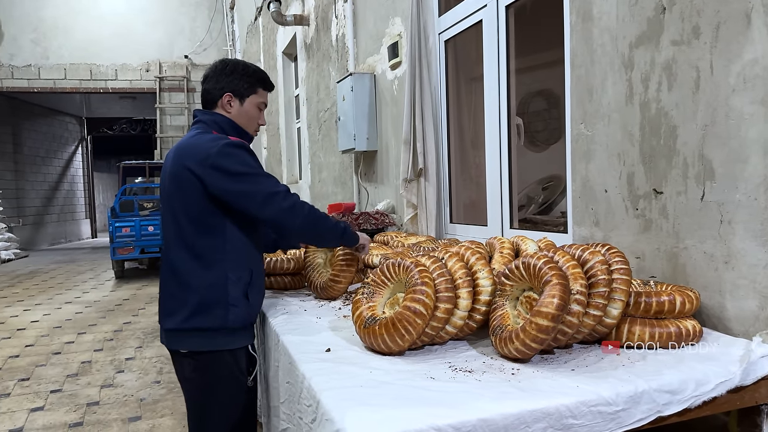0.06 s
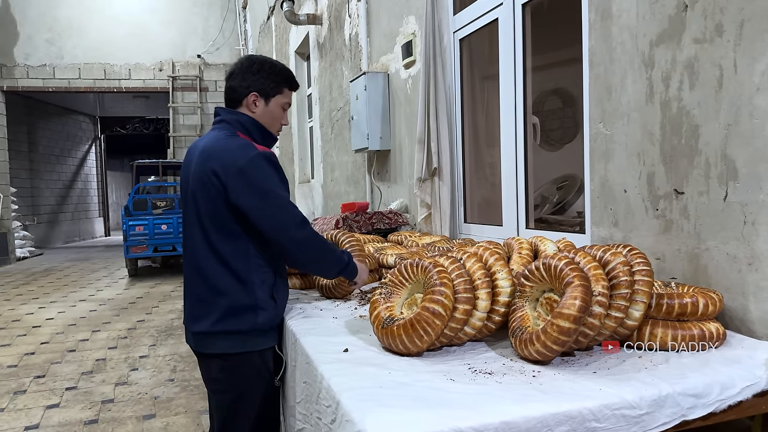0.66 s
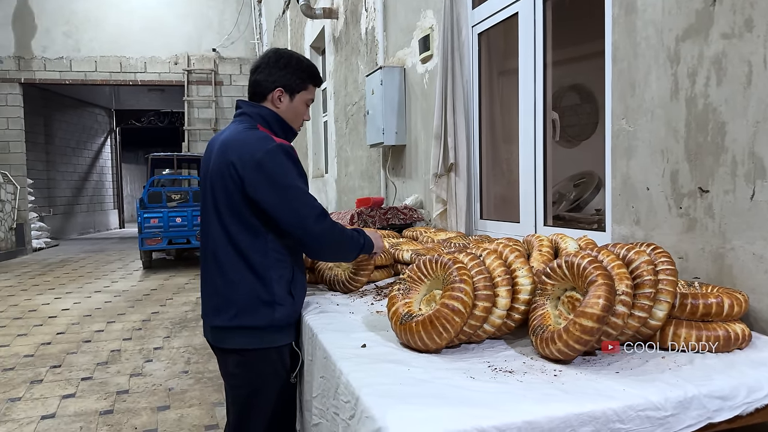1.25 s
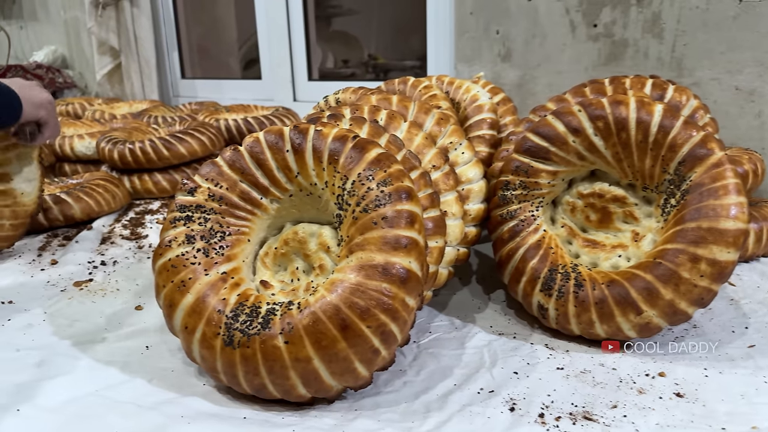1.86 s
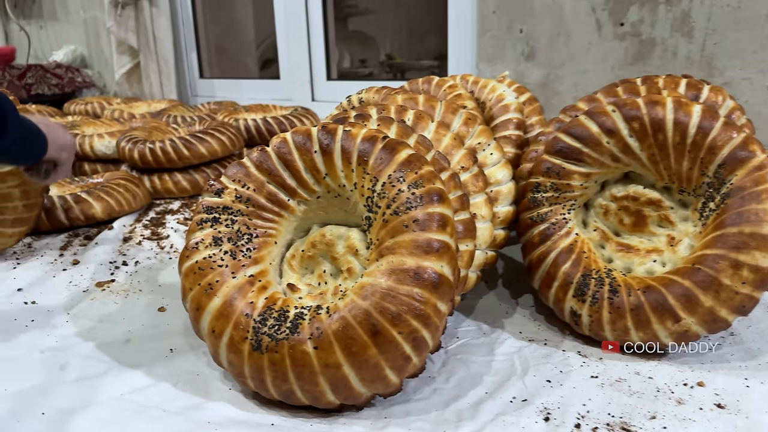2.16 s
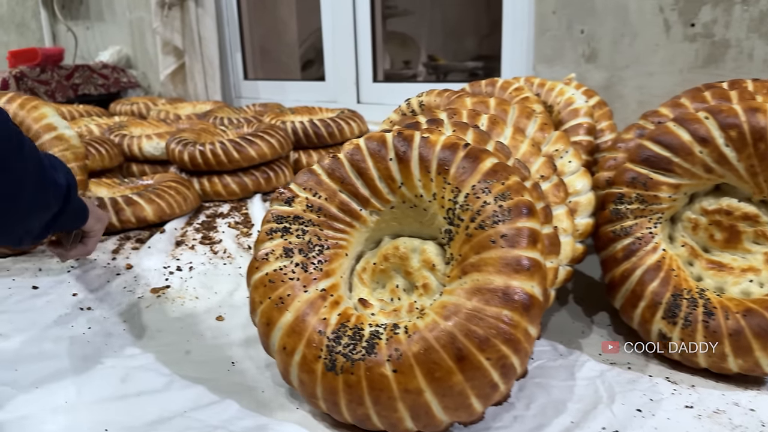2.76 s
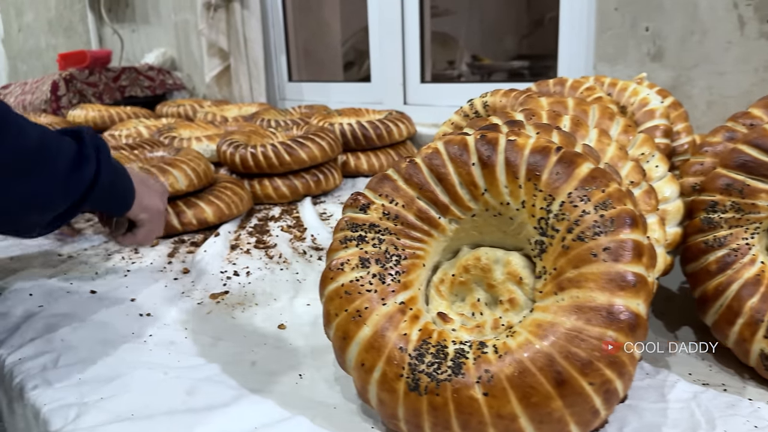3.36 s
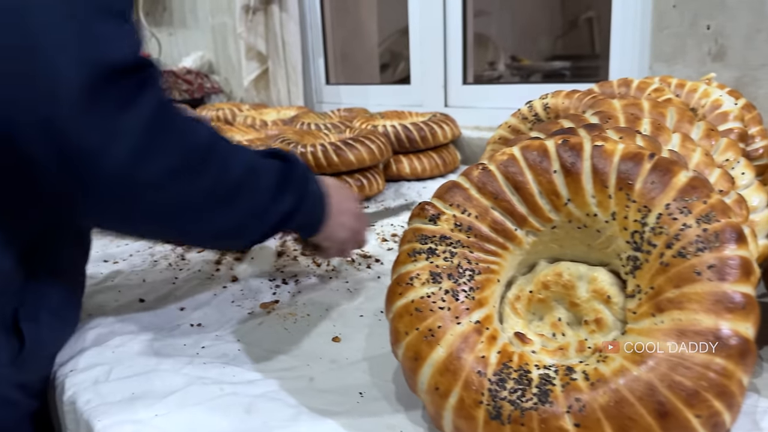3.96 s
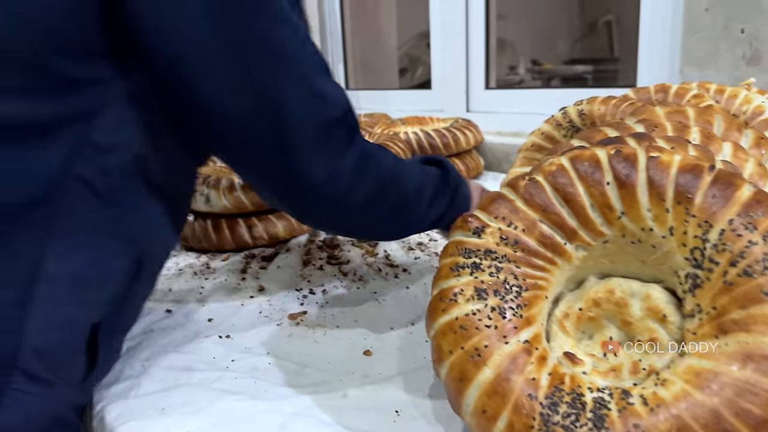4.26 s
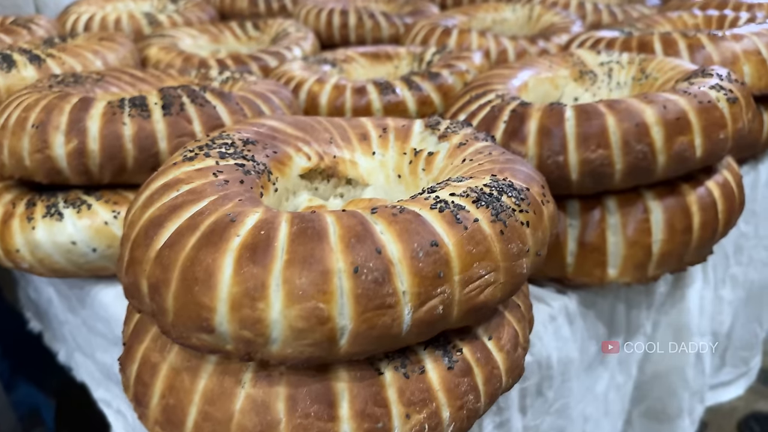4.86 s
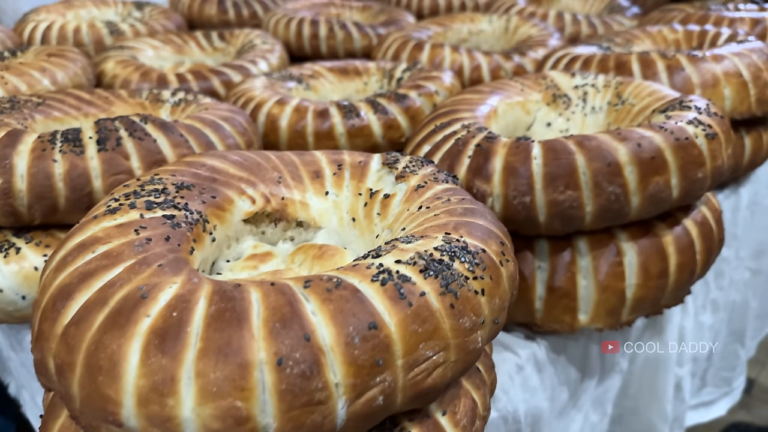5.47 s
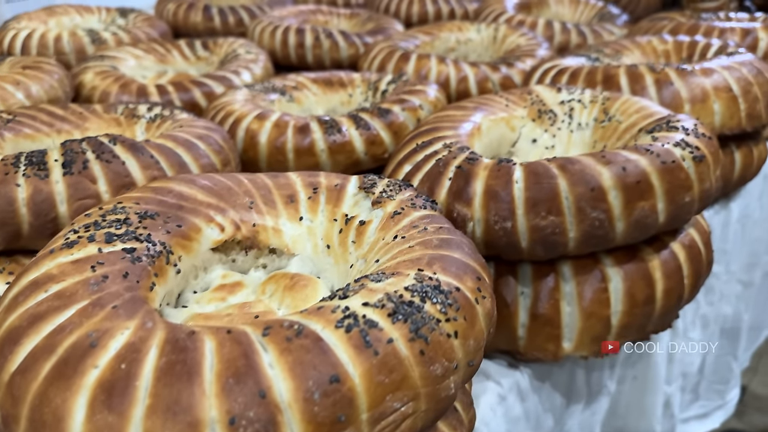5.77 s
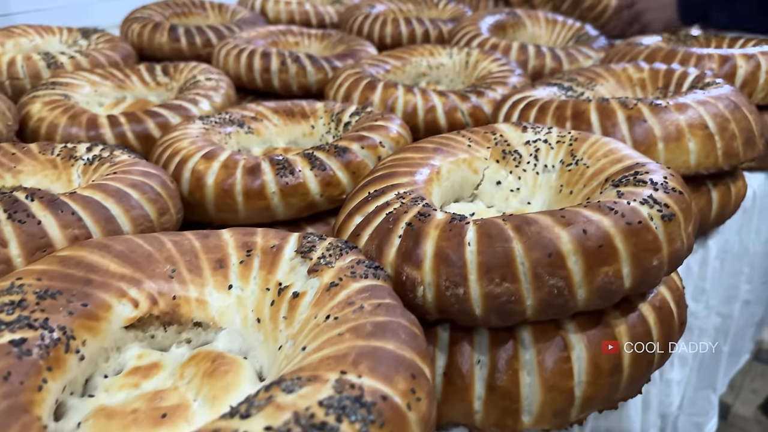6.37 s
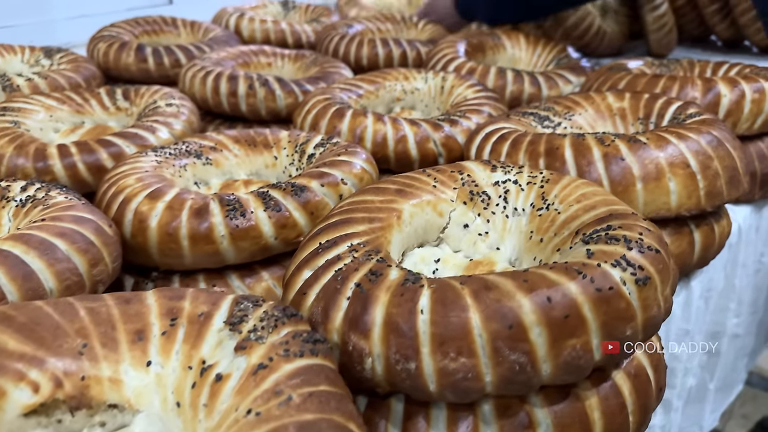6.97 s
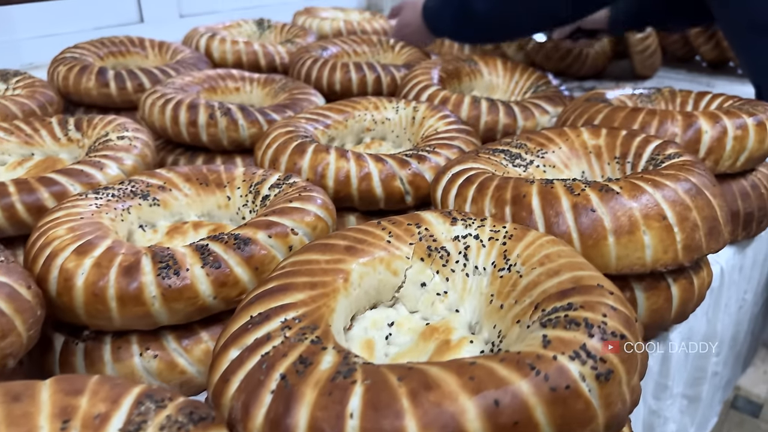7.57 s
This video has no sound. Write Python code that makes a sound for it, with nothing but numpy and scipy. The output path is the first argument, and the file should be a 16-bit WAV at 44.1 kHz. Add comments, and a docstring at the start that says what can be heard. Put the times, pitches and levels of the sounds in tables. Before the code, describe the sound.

Crusty ring flatbreads are stacked on a cloth-covered table, heard nearby through a small microphone with a light echo from hard yard walls. From the start, crust rubs on crust in short, dry, crackling strokes, with hollow knocks at about 0.1 and 0.7 seconds and faint distant pats. Between 1.5 and 2.7 seconds the scrapes are brightest and loudest, and flakes snap sharply. Just after 3 seconds a rim clacks, loaves knock and the table gives a low thump. Softer, longer scrapes and more taps follow around 4 seconds, while a sleeve rustles faintly. From 5 seconds the scrapes are sparser, with a sharp snap and knock near 5.3, and faint echoing patting runs far off at about three a second. A cluster of hollow knocks and a table thump lands at 7 seconds. Tiny crumb ticks are scattered throughout, over very faint steady background noise.

```python
"""Stacking crusty ring flatbreads

Loaves are stacked on a cloth-covered table in a hard-walled bakery yard. Crust scrapes on crust in
short crackling strokes, brighter when pressed harder. Flakes snap, rims clack, crumbs skitter,
loaves knock hollowly and the table booms. A sleeve rustles with each reach; something far off is
patted in runs of about three a second, heard only through its echo."""
import sys
import numpy as np
from scipy import signal
from scipy.fft import rfft, irfft
from scipy.io import wavfile
from scipy.ndimage import uniform_filter1d

SR = 44100
rng = np.random.default_rng(int(sys.argv[2]) if len(sys.argv) > 2 else 0)


def wav_out(sig):
    """Save sig, one row per channel (or a flat mono array), as 16-bit PCM at SR to the path in sys.argv[1]."""
    wavfile.write(sys.argv[1], SR, np.round(np.clip(np.atleast_2d(sig).T, -1, 1) * 32767).astype(np.int16))


N = 336026
TIME = np.arange(N) / SR
LOW_CUT_HZ, HIGH_CUT_HZ = 55, 16000

# crust rubbing on crust: (time [s], length [s], level [dB])
STROKES = [(0.108, 0.062, -37), (0.289, 0.033, -39), (0.482, 0.049, -35.5), (0.643, 0.035, -41),
           (0.671, 0.039, -37.5), (.847, 0.019, -43.5), (1.328, 0.024, -36.5), (1.509, 0.0073, -32.5),
           (1.524, 0.053, -32.5), (1.698, 0.0035, -24.5), (1.736, 0.0082, -28), (1.883, 0.024, -27),
           (1.92, 0.02, -30.5), (2.057, 0.0054, -29.5), (2.066, 0.015, -25), (2.239, 0.005, -32.5),
           (2.25, 0.043, -45.5), (2.402, 0.053, -38), (2.431, 0.011, -27.5), (2.462, 0.011, -33),
           (2.52, 0.0095, -39), (2.589, 0.039, -36.5), (2.624, 0.014, -36.5), (2.654, 0.037, -42.5),
           (2.878, 0.029, -49.5), (2.954, 0.0092, -40), (2.983, 0.079, -44.5), (3.125, 0.067, -40),
           (3.201, 0.035, -39), (3.424, 0.12, -41.5), (3.512, 0.014, -40), (3.77, 0.18, -46.5),
           (3.839, 0.025, -35.5), (3.89, 0.21, -52), (4.81, 0.036, -37.5), (4.949, 0.015, -42),
           (4.974, 0.015, -38), (5.248, 0.016, -38.5), (5.609, 0.019, -33), (5.792, 0.028, -37.5),
           (5.96, 0.026, -36.5), (6.145, 0.0051, -32), (6.334, 0.0017, -37), (6.394, 0.0017, -36),
           (6.941, 0.035, -41.5), (6.981, 0.011, -37), (7.098, 0.021, -46), (7.497, 0.0078, -48.5)]
# loaf in hand: (from [s], ring [Hz], ring [dB], sizzle [dB], brightness [dB], hollowness [dB],
# echo send [dB])
LOAVES = [(0, 1630, 6, 8, -5.5, -0.5, -12), (0.6, 3600, 7, 7.5, -6, -9.5, -11),
          (1.4, 3160, 2.5, 5, -5, -3, -20.5), (2.3, 1265, 9, 2, 2.5, 2, -17.5),
          (2.55, 657, 8.5, -0.5, 1, 3, -17), (2.9, 1440, -8, -0.5, -13, -6, -10.5),
          (3.35, 2730, 4, 3, -0.5, 3.5, -17), (3.7, 1320, -1.5, 7, -8.5, -6, -13),
          (4.4, 1290, 3, 2, -2.5, 1, -13.5), (5.5, 1270, 7, 10.5, -2.5, 2.5, -14),
          (6.1, 1190, 4.5, 8.5, -6.5, -3.5, -10)]


def scrapes(attack_share, release_s, touch_db, treble_per_db, ring_per_db, size=8192):
    """Pressure breaks finer flakes and flexes the shell. Returns direct sound and ringless echo feed."""
    direct, to_walls, t, hz = np.zeros(N), np.zeros(N), TIME[:size], bins(size)
    bright = at_hz([(1300, 0), (4000, .75), (14000, 1)], hz)
    hollow = at_hz([(250, 1), (1000, 0)], hz)
    bass_cut_db = at_hz([(60, -18), (190, -1.5)], hz)
    ordinary_stroke_db = -35
    for s, length_s, level_db in STROKES:
        ring_hz, ring_db, _, bright_db, hollow_db, _ = loaf_at(s)
        force_db = level_db - ordinary_stroke_db
        bright_db += treble_per_db * force_db
        ring_db += ring_per_db * max(force_db, 0)
        tone_db = crust_colour(s, hz) + bright_db * bright + hollow_db * hollow + bass_cut_db
        pressure = 1 - np.exp(-t / (attack_share * length_s))
        pressure *= np.exp(-np.maximum(t - length_s, 0) / release_s)
        pressure *= from_db(touch_db * np.exp(-t / 0.0091))  # first touch bites hardest
        grit = sum(crust_patch(size, ring_s=0.0012) for _ in range(2))
        splinters = fractures(size, per_s=110, spread_db=3.5, ridge_db=0, ridges_per_s=260)
        sound = (steady(grit, window_s=0.014) + from_db(16) * splinters) * pressure
        gain = from_db(level_db) * np.sqrt(length_s * SR / size)
        add(direct, s, gain * rms_one(colour(sound, tone_db + ring_db * hump(hz, ring_hz))))
        add(to_walls, s, gain * rms_one(colour(sound, tone_db)))
    return direct, to_walls


def crust_patch(size, ring_s):
    """A rubbed patch of crust: a shower of fractures excites its own small resonances."""
    cracks = fractures(size, per_s=2400, spread_db=4.5, ridge_db=5.5, ridges_per_s=260)
    response = rng.standard_normal(512) * np.exp(-TIME[:512] / ring_s)
    return signal.fftconvolve(cracks, response / np.linalg.norm(response))[:size]


def fractures(size, per_s, spread_db, ridge_db, ridges_per_s):
    """Tiny uneven cracks that clump as the ridges of the loaves catch."""
    onsets = rng.random(size) < per_s / SR
    heft = np.minimum(rng.exponential(1, size), 3)
    ridges = np.interp(TIME[:size] * ridges_per_s, np.arange(size), rng.uniform(-1.9, 1, size))
    return onsets * rng.choice([-1, 1], size) * from_db(spread_db * heft + ridge_db * ridges)


def crust_colour(s, hz):
    """Crust spectrum in dB, plus the sizzle of the current loaf's finest flakes."""
    # rubbed crust: (frequency [Hz], level [dB])
    spectrum = [(170, -0.5), (280, 3), (440, 0), (660, 0), (900, -4), (1280, -1), (2000, -3), (3000, -1),
                (7600, -11.5), (11000, -18), (14500, -15)]
    _, _, sizzle_db, *_ = loaf_at(s)
    return at_hz(spectrum, hz) + sizzle_db * at_hz([(8000, 0), (13000, 1)], hz)


def loaf_at(s):
    """Settings of the loaf in hand, without the start time."""
    return LOAVES[sum(row[0] <= s for row in LOAVES[1:])][1:]


def flake_snaps(crumble_s, crumble_gain, ring_above_db, size=2048):
    """A flake cracks once and crumbles; a weak snap is dry, a hard one rings briefly."""
    # (time [s], peak [dB], ring [Hz])
    snaps = [(0.863, -22, 4000), (0.935, -21, 3300), (1.740, -16, 3000), (1.886, -15, 3130),
             (2.162, -16.5, 4100), (2.429, -29, 3300), (2.627, -19, 7160), (2.644, -17.5, 2200),
             (2.664, -24, 3130), (2.673, -22, 3570), (3.224, -22.5, 2940), (4.529, -23.5, 6600),
             (5.015, -25, 2440), (5.252, -15.5, 6170), (6.505, -28.5, 1410)]
    out, t, hz = np.zeros(N), TIME[:size], bins(size)
    tilt_db = at_hz([(400, -8), (3000, -5)], hz)
    for s, peak_db, ring_hz in snaps:
        crack = crumble_gain * rng.standard_normal(size) * np.exp(-t / crumble_s)
        crack[0] += 1
        ring_db = max(peak_db - ring_above_db, 0)
        sound = colour(crack, crust_colour(s, hz) + tilt_db + ring_db * hump(hz, ring_hz))
        add(out, s, at_peak(sound, peak_db))
    return out


def rim_taps(touch_s, decay_s, note_db, size=4096):
    """A rim lands without sliding: a dull burst of fractures sounds the hollow under the crust."""
    # (time [s], peak [dB], hollow note [Hz])
    taps = [(3.151, -21.5, 1200), (3.894, -20.5, 1830), (4.039, -23.5, 1300), (4.611, -31.5, 1230),
            (4.651, -34, 1800), (6.943, -20.5, 610)]
    # (frequency [Hz], level [dB])
    clack_spectrum = [(150, 5.5), (2000, -1), (2900, -5), (8000, -31), (15000, -22)]
    out, t, hz = np.zeros(N), TIME[:size], bins(size)
    envelope = (1 - np.exp(-t / touch_s)) * np.exp(-t / decay_s)
    for s, peak_db, note_hz in taps:
        cracks = fractures(size, per_s=8000, spread_db=2, ridge_db=3, ridges_per_s=220)
        sound = colour(cracks * envelope, at_hz(clack_spectrum, hz) + note_db * hump(hz, note_hz))
        add(out, s, at_peak(sound, peak_db))
    return out


def loaf_knocks(t60_cycles, overtone_db, contact_s, start_ratio, end_ratio, sag_cycles):
    """Loaf hits loaf: fast flexing arrives first, so the note sags; the soft crumb damps it."""
    # (time [s], level [dB], pitch [Hz])
    knocks = [(.098, -29, 128), (.742, -25.5, 490), (.75, -35.5, 203), (1.56, -30, 251), (3.063, -30, 640),
              (3.136, -23, 543), (3.148, -26.5, 239), (3.894, -40, 200), (4.056, -39, 126),
              (4.487, -36, 470), (4.515, -37.5, 173), (4.706, -38, 195), (4.815, -28.5, 263),
              (5.254, -29.5, 186), (6.337, -35.5, 220), (6.956, -23.5, 240), (6.974, -24.5, 370),
              (6.984, -24.5, 121), (7.158, -30.5, 147)]
    out, t = np.zeros(N), TIME[:SR // 4]
    for s, level_db, hz in knocks:
        pitch_hz = hz * (end_ratio + (start_ratio - end_ratio) * np.exp(-t * hz / sag_cycles))
        phase = 2 * np.pi * np.cumsum(pitch_hz) / SR
        fade = from_db(-60 * t * hz / t60_cycles)
        note = fade * np.sin(phase) + from_db(overtone_db) * fade ** 2 * np.sin(2 * phase)
        add(out, s, from_db(level_db) * note * (1 - np.exp(-t / contact_s)))
    return out


def crumbs(skitter_s, pinch_db, stray_db, mean_wait_s, size=2048):
    """Pinches of crumbs and seeds skitter in dry ticks; three strays follow each stroke."""
    # a pinch breaks loose: (time [s])
    pinch_times = [.981, 1.086, 1.110, 1.152, 2.783, 4.486, 4.539, 5.098, 5.165, 5.229, 5.322, 6.361, 6.455,
                   6.738, 7.241]
    falls = [(s, pinch_db) for s in pinch_times]
    for s, length_s, _ in STROKES:
        falls += [(s + length_s + wait_s, stray_db) for wait_s in rng.exponential(mean_wait_s, 3)]
    out, t, hz = np.zeros(N), TIME[:size], bins(size)
    thin_db = at_hz([(300, -16), (2500, 0)], hz)
    for s, peak_db in falls:
        ticks = fractures(size, per_s=1800, spread_db=4, ridge_db=4, ridges_per_s=220)
        sound = colour(ticks * np.exp(-t / skitter_s), crust_colour(s, hz) + thin_db)
        add(out, min(s, TIME[-1]), at_peak(sound, peak_db))
    return out


def table_booms(contact_s):
    """The boards boom under the cloth; pitch depends on where the loaf lands."""
    # (time [s], level [dB], lowest mode [Hz])
    landings = [(0.096, -50.5, 82), (0.947, -49.5, 57.6), (3.159, -50, 94.3), (5.024, -59, 93.5),
                (5.26, -51, 99.6), (6.984, -44, 64), (7.504, -55.5, 102)]
    # table top: (ratio to lowest mode, level [dB], t60 [s])
    modes = [(1, 11, 0.19), (2.05, 7, 0.17), (4.2, 15, 0.019)]
    out, t = np.zeros(N), TIME[:SR]
    for s, level_db, hz in landings:
        boom = sum(from_db(db) * damped(t, hz * ratio, t60_s) for ratio, db, t60_s in modes)
        add(out, s, from_db(level_db) * boom * (1 - np.exp(-t / contact_s)))
    return out


def yard_echo(x, build_s, bands=14):
    """Diffuse wall echo as noise following each band's energy; farther loaves send more to it."""
    # (frequency [Hz], gain [dB])
    wall_gain = [(60, 20), (150, 5), (500, 4.5), (1500, 5.5), (4000, 1.5), (15000, -4)]
    # (frequency [Hz], t60 [s])
    decay_times = [(100, 1), (1000, 0.61), (4000, 0.75), (15000, 0.28)]
    starts_s, *_, send_db = np.transpose(LOAVES)
    sent = x * from_db(send_db)[np.searchsorted(starts_s[1:], TIME)]
    out, edges_hz = 0, np.geomspace(45, HIGH_CUT_HZ, bands + 1)
    for low_hz, high_hz in zip(edges_hz, edges_hz[1:]):
        centre_hz = np.sqrt(low_hz * high_hz)
        band = signal.butter(2, [low_hz, high_hz], "band", fs=SR, output="sos")
        decay_s = at_hz(decay_times, centre_hz) / np.log(10 ** 6)
        energy = lag(lag(signal.sosfilt(band, sent) ** 2, build_s), decay_s)
        wash = rms_one(signal.sosfilt(band, rng.standard_normal(N)))
        out += from_db(at_hz(wall_gain, centre_hz)) * np.sqrt(energy) * wash
    return out


def far_pats(build_s, t60_s):
    """Distant patting: only diffuse sound arrives, building up and dying away."""
    # (time [s], level [dB])
    pats = [(.084, -39.5), (.803, -41), (1.112, -41.5), (1.461, -50), (5.181, -47), (5.518, -43),
            (5.858, -45), (6.198, -47.5), (6.565, -45.5), (6.912, -46), (7.278, -42.5)]
    # (frequency [Hz], level [dB])
    echo_spectrum = [(100, 1), (600, 1), (950, 9.5), (1350, 9), (2000, 2), (2900, -10.5), (15000, -72)]
    out, t = np.zeros(N), TIME[:SR]
    envelope = (1 - np.exp(-t / build_s)) * from_db(-60 * t / t60_s)
    for s, level_db in pats:
        add(out, s, noise(echo_spectrum, SR) * at_peak(envelope, level_db))
    return out


def sleeve(flutter_db, folds_per_s):
    """Sleeve slides on jacket: each reach swells and fades, fluttering as folds slip past."""
    # (middle [s], half length [s], level [dB])
    reaches = [(0, 0.063, -46.5), (3.93, 0.22, -59), (4.69, 0.54, -58.5), (5.263, 0.13, -55),
               (6.457, 0.74, -65.5)]
    # (frequency [Hz], level [dB])
    cloth_spectrum = [(150, 13.5), (1200, 10.5), (5000, 4.5), (9000, -7), (15000, -4)]
    speed = sum(from_db(db) * np.exp(-((TIME - mid_s) / half_s) ** 2) for mid_s, half_s, db in reaches)
    folds = np.interp(TIME * folds_per_s, np.arange(N), 2 * rng.random(N) - 1)
    return speed * from_db(flutter_db * folds) * noise(cloth_spectrum, N)


def still_air(rms_db):
    """Faint steady background noise."""
    # (frequency [Hz], level [dB])
    spectrum = [(30, -13), (70, 19.5), (200, 10), (700, 3), (1500, 8.5), (4000, -7.5), (9000, -21),
                (15000, -10.5)]
    return from_db(rms_db) * noise(spectrum, N)


def from_db(db):
    return 10 ** (np.asarray(db) / 20)


def rms_one(x):
    return x / np.sqrt(np.mean(x ** 2) + 1e-20)


def at_peak(x, peak_db):
    return from_db(peak_db) * x / np.abs(x).max()


def at_hz(points, hz):
    """Interpolate over log frequency."""
    known_hz, values = np.transpose(points)
    return np.interp(np.log(np.maximum(hz, 1)), np.log(known_hz), values)


def add(track, s, sound):
    start = max(round(s * SR), 0)
    track[start:start + len(sound)] += sound[:N - start]


def bins(size):
    return np.arange(size // 2 + 1) * SR / size


def colour(x, gain_db):
    """Minimum-phase filter, one gain per bin."""
    cepstrum = irfft(np.log(from_db(gain_db)))
    cepstrum[1:len(x) // 2] *= 2
    cepstrum[len(x) // 2 + 1:] = 0
    return irfft(rfft(x) * np.exp(rfft(cepstrum)))


def noise(spectrum, size):
    """Shaped noise, rms 1."""
    gain = from_db(at_hz(spectrum, bins(size)))
    return rms_one(irfft(rfft(rng.standard_normal(size)) * gain, size))


def resonance(x, hz, width_hz):
    """Band-pass, peak gain 1."""
    r = np.exp(-np.pi * width_hz / SR)
    feedback = [1, -2 * r * np.cos(2 * np.pi * hz / SR), r * r]
    return signal.lfilter(np.array([1, 0, -1]) * (1 - r * r) / 2, feedback, x)


def hump(hz, centre_hz, half_width_octaves=0.18):
    """Shape of a crust resonance, peak 1."""
    return 1 / (1 + (np.log2((hz + 1) / centre_hz) / half_width_octaves) ** 2)


def damped(t, hz, t60_s):
    return np.sin(2 * np.pi * hz * t) * from_db(-60 * t / t60_s)


def steady(x, window_s):
    """Even out the level, keeping the grain within the window."""
    power = np.abs(uniform_filter1d(x ** 2, int(window_s * SR)))
    return x / np.sqrt(power + 1e-6)


def lag(x, time_s):
    """One-pole smoothing."""
    r = np.exp(-1 / (time_s * SR))
    return signal.lfilter([1 - r], [1, -r], x + 1e-18)


def scene():
    """Bread handling, its echo and the background, in mono."""
    strokes = scrapes(attack_share=0.077, release_s=0.0062, touch_db=2.5,
                      treble_per_db=0.6, ring_per_db=0.5)
    crust, crust_to_walls = from_db(1.5) * np.array(strokes)
    flakes = flake_snaps(crumble_s=0.0027, crumble_gain=0.21, ring_above_db=-29.5)
    rims = rim_taps(touch_s=0.0055, decay_s=0.0049, note_db=11)
    knocks = from_db(1.5) * loaf_knocks(t60_cycles=13, overtone_db=-6, contact_s=0.002,
                                        start_ratio=1.25, end_ratio=0.9, sag_cycles=1.4)
    ticks = crumbs(skitter_s=0.004, pinch_db=-34.5, stray_db=-41, mean_wait_s=0.071)
    booms = from_db(5) * table_booms(contact_s=0.0024)
    air = still_air(rms_db=-60.5)
    pats = from_db(-0.5) * far_pats(build_s=0.011, t60_s=0.6)
    contacts = rims + knocks + ticks
    echo = yard_echo(crust_to_walls + contacts + 0.5 * flakes, build_s=0.0056)
    rustle = sleeve(flutter_db=3, folds_per_s=18)
    return (crust + flakes + contacts + booms + echo + pats + rustle + air)[None]


def record(dry):
    """Small microphone: treble resonances, deep bass and top cut."""
    # (frequency [Hz], width [Hz], gain [dB])
    resonances = [(5200, 360, 4), (7080, 1850, 4.5), (10860, 1970, 8.5)]
    for hz, width_hz, gain_db in resonances:
        dry = dry + (from_db(gain_db) - 1) * resonance(dry, hz, width_hz)
    dry = signal.sosfilt(signal.butter(4, LOW_CUT_HZ, "high", fs=SR, output="sos"), dry)
    return signal.sosfilt(signal.ellip(10, .2, 80, HIGH_CUT_HZ, fs=SR, output="sos"), dry)


dry = scene()
out = record(dry)
wav_out(out)
```